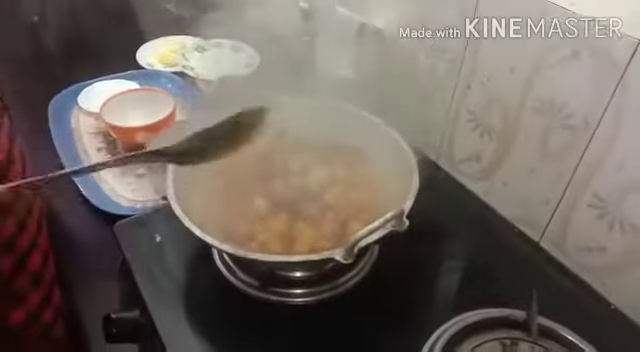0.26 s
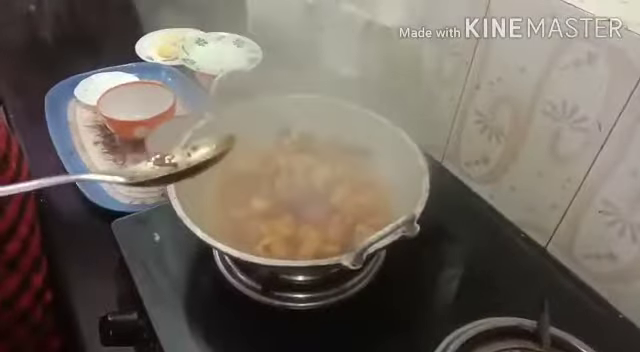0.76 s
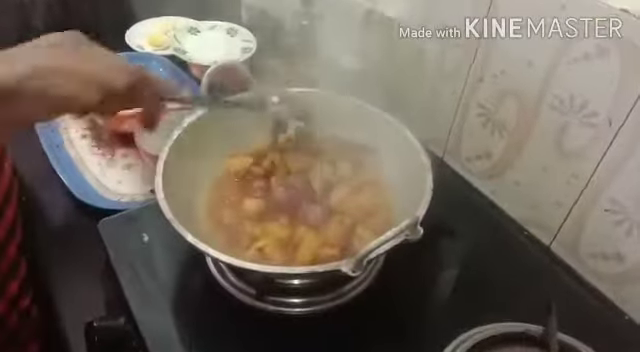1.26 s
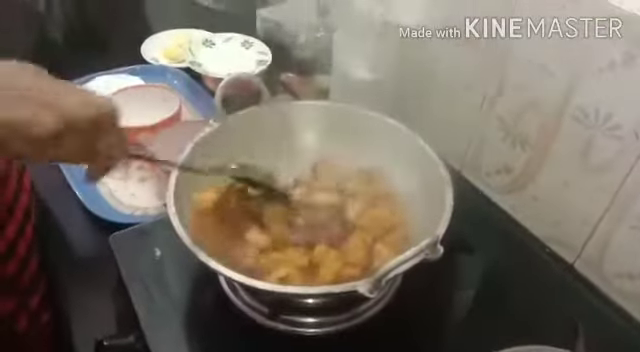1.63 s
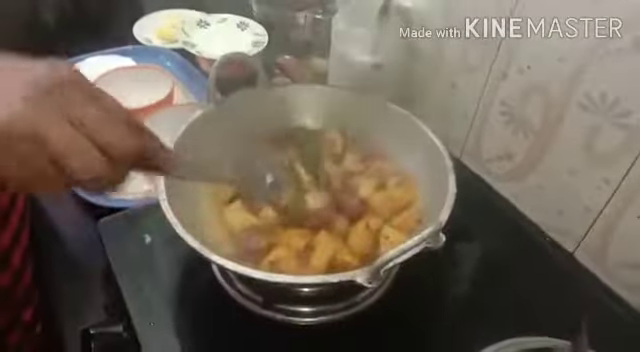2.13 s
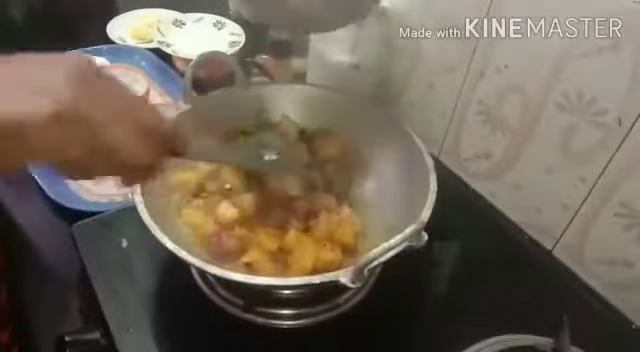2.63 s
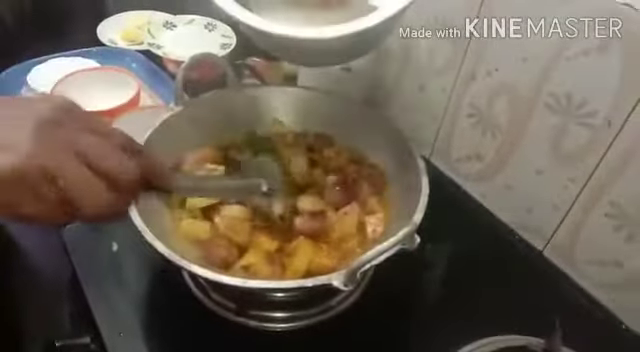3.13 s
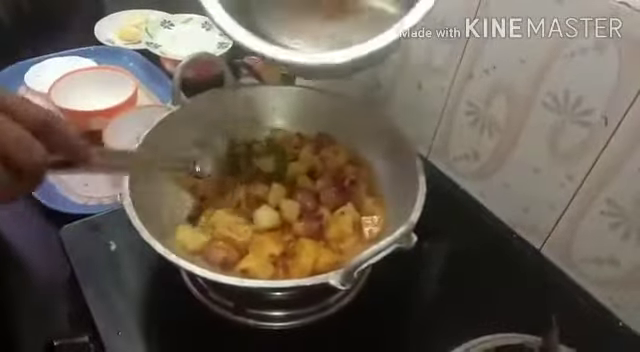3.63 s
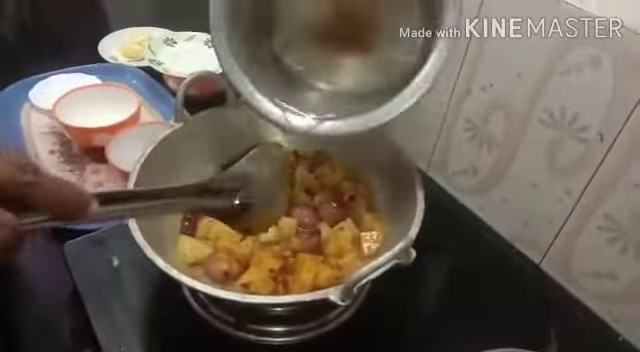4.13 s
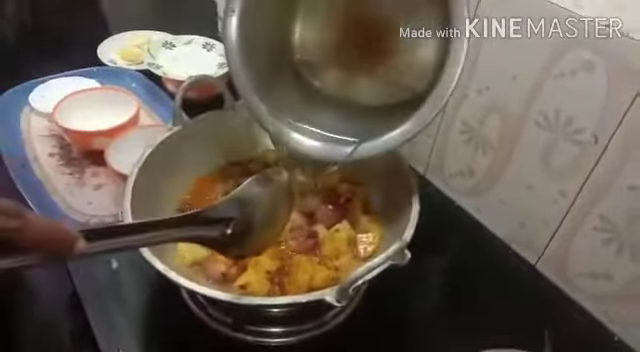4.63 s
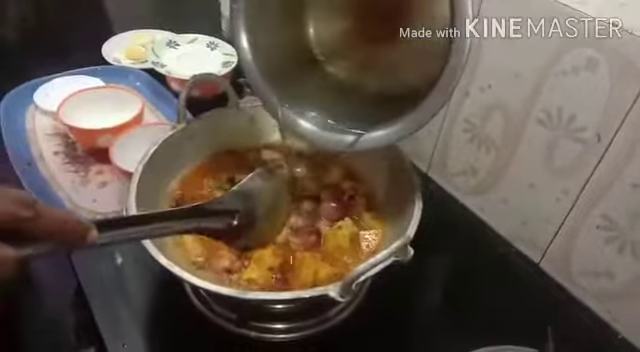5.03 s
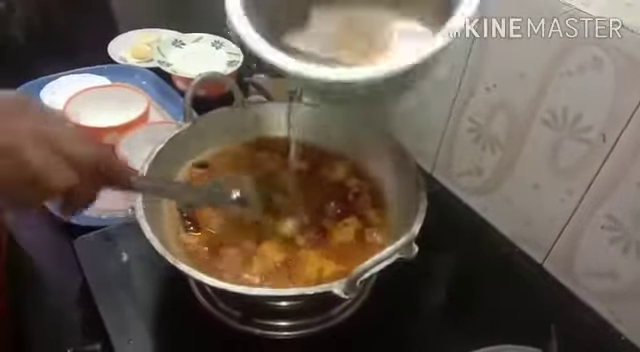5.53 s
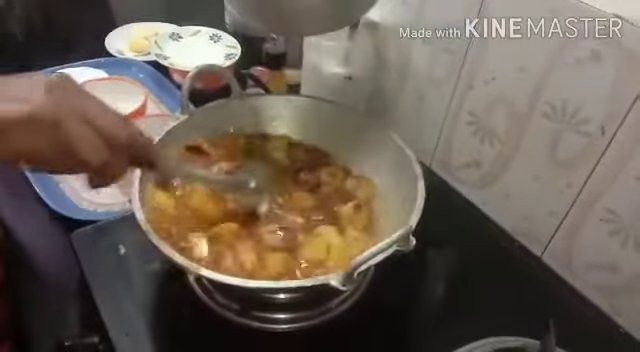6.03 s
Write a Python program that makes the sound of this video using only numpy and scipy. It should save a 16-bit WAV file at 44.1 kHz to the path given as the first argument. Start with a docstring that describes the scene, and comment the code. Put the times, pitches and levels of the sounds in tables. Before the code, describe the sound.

Close, loud frying with ringing spoon knocks on metal, briefly quenched by poured water before a wet boil returns with brisk stirring.

```python
"""Sizzling pan, spoon and water pot

Vegetables sizzle in a hot metal pan in a small tiled kitchen: randomly bursting bubbles plus crackle and spray.
A steel spoon clicks on the pan, rings its modes and scrapes as it turns the food; most strokes swell the sizzle.
Water from a pot quenches the frying, then comes to the boil and is stirred in; a gas burner rushes low beneath.
A phone close above hears it in mono; its limiter ducks the whole sound around the loudest peaks."""
import sys
import numpy as np
from scipy import signal
from scipy.fft import rfft, irfft
from scipy.io import wavfile
from scipy.ndimage import uniform_filter1d, minimum_filter1d

SR = 44100
rng = np.random.default_rng(int(sys.argv[2]) if len(sys.argv) > 2 else 0)


def wav_record(signal):
    """Record a signal, one row per channel, as 16-bit PCM in the file named by sys.argv[1]."""
    frames = np.transpose(np.atleast_2d(signal))
    bounded = np.clip(frames, -1, 1)
    # unit amplitude maps onto the largest positive 16-bit level
    quanta = np.round(bounded * 32767).astype(np.int16)
    wavfile.write(sys.argv[1], SR, quanta)


N = 276892
TIME = np.arange(N) / SR


def undb(db):
    """Decibels to gain."""
    return 10 ** (np.asarray(db) / 20)


def curve(table):
    """Straight lines through rows of (seconds, value), as a control over the whole scene."""
    seconds, values = np.transpose(table)
    return np.interp(TIME, seconds, values)


def ramp(start_s, takes_s):
    """A change from 0 to 1 that starts at start_s."""
    return np.clip((TIME - start_s) / takes_s, 0, 1)


def add(track, start_s, sound):
    """Mix a sound into the track at start_s."""
    i = int(start_s * SR)
    track[i:i + len(sound)] += sound[:N - i]


def unit(x):
    """Scale to rms 1."""
    return x / np.sqrt(np.mean(x ** 2))


def colour(x, spectrum):
    """Minimum-phase filter, built by folding the cepstrum, with the given (Hz, dB) shape; rms 1."""
    hz, db = np.transpose(spectrum)
    size = 4096
    bin_hz = np.arange(size // 2 + 1) * SR / size
    bin_db = np.interp(np.log(bin_hz + 1), np.log(hz), db)
    cepstrum = irfft(np.log(undb(bin_db)))
    cepstrum[1:size // 2] *= 2
    cepstrum[size // 2 + 1:] = 0
    impulse = irfft(np.exp(rfft(cepstrum)))
    return unit(signal.fftconvolve(x, impulse)[:len(x)])


def band(x, hz):
    """One broad resonance."""
    return colour(x, [(hz / 8, -50), (hz * 0.93, -9), (hz, 0), (hz * 1.25, -10), (hz * 4, -50)])


def walk(rate_hz):
    """Slow chance of rms 1, with rate_hz new random values a second joined by lines."""
    knots = rng.standard_normal(2048)
    return unit(np.interp(TIME * rate_hz, np.arange(len(knots)), knots))


def pops(rate_hz, spread_db):
    """Random one-sample bursts of either sign, with sizes scattered in dB."""
    chance, size = rng.random(N), rng.standard_normal(N)
    heights = undb(spread_db * np.clip(size, -3, 3))
    return (chance < rate_hz / SR) * heights * rng.choice([-1, 1], N)


def ring(modes, size=SR):
    """Decaying sines of alternating sign from rows (Hz, t60 in seconds, dB)."""
    t = TIME[:size]
    total = 0
    for k, (hz, t60, db) in enumerate(modes):
        total = total + (-1) ** k * undb(db - 60 * t / t60) * np.sin(2 * np.pi * hz * t)
    return total


def kitchen(x, wet_db, t60):
    """Tiled walls return a dense, short tail, here decaying noise that starts after 3 ms."""
    t = TIME[:SR // 2]
    tail = rng.standard_normal(len(t)) * undb(-60 * t / t60) * (t > .003)
    return x + undb(wet_db) * signal.fftconvolve(x, tail / np.linalg.norm(tail))[:N]


# Low rush under the stove. Each row: frequency in Hz, level in dB.
BURNER_SPECTRUM = [(25, -8), (50, -10), (72, -3), (100, 1), (150, 4.5), (215, -5), (275, -8), (300, 4.5),
                   (340, -5.5), (450, -9), (700, -13.5), (2000, -20.5)]


def burner():
    """The gas burner rushes as low noise whose level wanders."""
    return undb(-53.0 + walk(9.9)) * colour(rng.standard_normal(N), BURNER_SPECTRUM)


# The spoon spreads the sauce and bares hot metal; later the water runs in.
SPREAD_S, SPREAD_TAKES_S = 1.51, 0.54
POUR_S, POUR_TAKES_S = 3.93, 0.76
# Heat of the pan floor, sinking under the water and recovering. Each row: time in seconds, heat in dB.
PAN_HEAT = [(0, 0), (1.4, -2.2), (2.0, 0), (2.55, -0.15), (3.1, -3), (3.8, -3), (4.55, -11.5), (4.9, -11),
            (5.08, -5), (6.28, -4)]


def sizzle_db(law):
    """Level of one part of the sizzle from heat, stirring, bared metal and added water."""
    base_db, per_heat, per_surge, spread_db, water_db = law
    driven = base_db + per_heat * curve(PAN_HEAT) + per_surge * surge()
    bared = spread_db * ramp(SPREAD_S, SPREAD_TAKES_S)
    watered = water_db * ramp(POUR_S, POUR_TAKES_S)
    return driven + bared + watered


def bubbles(rate_hz, cycles, glide, count=24):
    """Steam bubbles of many sizes, each fading by 1/e in so many cycles and sliding in pitch."""
    out, t = 0, TIME[:SR // 25]
    for hz in np.geomspace(1000, 4400, count):
        age = t * hz / cycles
        chirp = np.exp(-age) * np.sin(2 * np.pi * hz * t * (1 + glide * np.tanh(age)))
        bursts = pops(rate_hz / count, spread_db=1.5)
        out = out + hz * signal.fftconvolve(bursts, chirp)[:N]
    return unit(out)


# Air in the bowl of the pan. Each row: frequency in Hz, sharpness Q, boost as a gain.
BOWL_RESONANCES = [(674, 15, 0.99), (1250, 16, 1.0), (3085, 40, 0.1)]


def bowl(x):
    """The hollow of the pan resonates with whatever boils in it."""
    out = x
    for hz, q, boost in BOWL_RESONANCES:
        out = out + boost * signal.lfilter(*signal.iirpeak(hz, q, fs=SR), x)
    return out


# How the boiling answers the pan. The row: base level in dB, dB per dB of heat, dB per dB of surge,
# change in dB once the sauce is spread, change in dB once watered.
BOILING_LAW = (-21, 0.76, 0.7, -7, 5)
# Share of thin, watery liquid in the pan. Each row: time in seconds, share from 0 to 1.
THIN_SHARE = [(0, 0.02), (1.3, 0), (1.9, 0.09), (2.6, 0.63), (3.5, 0.87), (4.5, 0.97), (6.28, 0.94)]
# Boiling sauce, then boiling water. Each row: frequency in Hz, level in dB.
SAUCE_SPECTRUM = [(80, -67), (270, -26), (550, -23.5), (700, -18), (850, -18), (1250, -14.5), (1550, -9),
                  (2000, -4.5), (2400, 1), (2900, -2), (3600, -7.5), (4500, -15), (5450, -6.5), (6800, -22)]
WATER_SPECTRUM = [(100, -79), (450, -38.5), (850, -16.5), (1200, -10.5), (1400, -9.5), (1700, -11),
                  (2150, -4.5), (3000, 0.5), (3900, -2), (4650, -16), (5400, -9), (6200, -7.5),
                  (7100, -3.5), (8200, -36)]


def boiling():
    """Bubbles burst and ring in the bowl, crossfading from thick sauce to thin water; both flicker in level."""
    thin = np.clip(curve(THIN_SHARE), 0, 1)
    froth = unit(pops(25000, spread_db=2.5)) + undb(-10.5) * bubbles(1800, cycles=7.7, glide=0.039)
    thick = colour(froth, SAUCE_SPECTRUM) * undb(0.34 * walk(70) + 0.22)
    other_froth = np.roll(froth, N // 2)  # so that the two layers do not burst together
    water = colour(other_froth, WATER_SPECTRUM) * undb(0.39 * walk(40) + 0.05)
    mix = undb(sizzle_db(BOILING_LAW)) * (np.sqrt(1 - thin) * thick + np.sqrt(thin) * water)
    return kitchen(bowl(mix), wet_db=-11.0, t60=0.22)


# How crackle and spray answer the pan. Each row: base level in dB before a small trim, dB per dB of heat,
# dB per dB of surge, change in dB once the sauce is spread, change in dB once watered.
CRACKLE_LAW = (-31.5, 1, 0.83, 5.5, -0.6)
FINE_SPRAY_LAW = (-26, 1.4, 1.16, -9, 2.5)
# Oil crackle, then the finer spray above it. Each row: frequency in Hz, level in dB.
CRACKLE_SPECTRUM = [(1000, -55), (4200, -9), (5100, -5.5), (5800, -4), (6350, -6), (7000, -1.5), (7550, 2),
                    (8050, -3), (9000, 3), (9900, 1), (10800, -4.5), (12000, -12.5), (13500, -16.5)]
SPRAY_SPECTRUM = [(3000, -52), (8000, -18), (10200, -2.5), (11300, 1.5), (12200, -5.5), (13000, -7),
                  (13850, -10), (14600, 4), (15100, 4), (15600, 1)]


def frying():
    """Droplets explode in hot oil: a dense crackle with a finer spray above it."""
    crackle = unit(pops(28000, spread_db=1.0)) + undb(-9) * unit(pops(150, spread_db=3.0))
    crackle_db = sizzle_db(CRACKLE_LAW) + .5 * walk(45) - 1.5
    spray_db = sizzle_db(FINE_SPRAY_LAW) + 0.85 * walk(70) + 2.15
    fry = colour(crackle, CRACKLE_SPECTRUM) * undb(crackle_db)
    spray = colour(pops(18000, spread_db=1.5), SPRAY_SPECTRUM) * undb(spray_db)
    return fry + spray


BUMP_ATTACK_S, BUMP_T60_S = 0.0044, 0.29
SETTLE_S, SETTLE_DB, BODY_DB = .072, -12, -1.5  # settling comes later and softer than its bump
# Low, damped body of the loaded pan. Each row: frequency in Hz, level in dB.
PAN_BODY = [(130, -37), (205, -18), (250, 1), (340, -1.5), (450, -19), (600, -10), (740, -3.5), (860, -9),
            (1100, -26)]
# Dull bumps of food and spoon. Each row: start in seconds, level in dB, contact pitch in Hz.
FOOD_BUMPS = [(.582, -29.5, 456), (1.418, -33.5, 370), (2.04, -37.5, 223), (2.45, -31, 268),
              (3.565, -30, 290), (3.655, -35.5, 270), (4.303, -46.5, 516), (4.52, -44, 320),
              (5.772, -30, 400)]


def bumps():
    """Food and spoon bump dully, the loaded pan answers with its body, and the food settles after each."""
    out, t = np.zeros(N), TIME[:SR]
    thud = undb(-60 * t / BUMP_T60_S) * (1 - np.exp(-t / BUMP_ATTACK_S))
    for s, db, hz in FOOD_BUMPS:
        for at, at_db in (s, db), (s + SETTLE_S, db + SETTLE_DB):
            contact, body = rng.standard_normal((2, len(t)))
            add(out, at, undb(at_db) * thud * (band(contact, hz) + undb(BODY_DB) * colour(body, PAN_BODY)))
    return out


# Ring of pan and spoon. Each row: frequency in Hz, t60 in seconds, then levels in dB when struck
# at the far wall, at the right wall and at the left wall.
PAN_RING = [(258, .35, -48, -33, -42), (301, 1.4, -44, -36, -50), (339, 1.15, -33, -31, -35),
            (842, .65, -29, -35, -38), (1405, 1.1, -31, -54, -27), (1470, 1.1, -19, -55, -35),
            (1970, .72, -8, -28, -19), (2315, .9, -25, -28, -27), (2756, .65, -20, -20, -13),
            (3135, .78, -20, -30, -14), (3612, .62, -16, -20, -12), (4134, .47, -20, -43, -10),
            (4947, .7, -34, -48, -29), (5416, .45, -31, -37, -29), (7644, .25, -50, -32, -40),
            (8958, .16, -43, -15, -34), (9400, .12, -45, -22, -32)]
# Dense weak modes beneath the ring. Each row: frequency in Hz, level in dB.
CLATTER_SPECTRUM = [(200, -25), (900, -15), (1400, -8.5), (2200, -3), (2700, 0), (3600, -14), (4400, -14),
                    (7000, -20.5)]
# Spoon on the pan. Each row: start in seconds, ring in dB, click peak in dB, click pitch in Hz,
# clatter in dB, place (0 far wall, 1 right wall, 2 left wall).
SPOON_STRIKES = [(1.4185, -2.5, 2.5, 1800, -24.5, 0), (2.4486, -4, -7, 5500, -36, 1),
                 (3.4985, -2, 4.5, 3500, -17, 2), (5.7098, -22, -6, 2000, -28.5, 1)]


def strikes():
    """The spoon clicks on the pan, which rings according to where it is hit; dense weak modes clatter beneath."""
    clicks, rings, t = np.zeros(N), np.zeros(N), TIME[:SR]
    for s, ring_db, click_db, hz, clatter_db, place in SPOON_STRIKES:
        modes = [(f, t60, place_db[place]) for f, t60, *place_db in PAN_RING]
        add(rings, s, undb(ring_db) * ring(modes))
        clatter = colour(rng.standard_normal(len(t)), CLATTER_SPECTRUM)
        add(rings, s, clatter * undb(clatter_db - 60 * t / 0.84))
        click_shape = [(hz / 16, -36), (hz / 2, -7), (hz, 0), (hz * 2, -12), (hz * 5, -26)]
        click = colour(signal.unit_impulse(SR // 50), click_shape)
        add(clicks, s, undb(click_db) * click / np.abs(click).max())
    return kitchen(clicks, wet_db=-2.5, t60=0.25) + kitchen(rings, wet_db=-13, t60=.4)


# Spoon scraping on the pan. Each row: frequency in Hz, level in dB.
SCRAPE_SPECTRUM = [(120, -19), (280, -6), (420, -3.5), (550, -6), (700, 1.5), (950, -1), (1120, -8.5),
                   (1250, 10), (1450, -8), (2500, 0.5), (3500, -8), (7000, -26)]
# Strokes turn wet food onto hot metal. Each row: start in seconds, length in seconds, scrape in dB,
# surge of the sizzle in dB.
SPOON_STROKES = [(1.578, 0.26, -40, 4), (1.958, 0.19, -37.5, 1), (2.186, 0.16, -41, 2),
                 (2.61, .2, -38, 5.5), (3.201, 0.097, -42, 8.5), (4.268, 0.041, -55, 2.5),
                 (5.707, 0.11, -26, -0.5), (5.81, 0.24, -36, 5), (6.127, 0.17, -31.5, 4)]


def stirring():
    """The spoon sticks and slips along the pan as random pops, each stroke starting fast and fading out."""
    force = np.zeros(N)
    for s, length, db, _ in SPOON_STROKES:
        u = np.arange(int(length * SR)) / (length * SR)
        add(force, s, undb(db) * np.minimum(u / 0.02, 1) * np.sqrt(1 - u))
    return kitchen(force * colour(pops(2500, spread_db=3.0), SCRAPE_SPECTRUM), wet_db=0, t60=0.37)


def surge(rise_s=0.036, fall_s=0.12):
    """The sizzle moves by each stroke's surge while it lasts and settles back after it, in dB."""
    total = 0
    for s, length, _, db in SPOON_STROKES:
        rise = 1 - np.exp(-np.clip(TIME - s, 0, length) / rise_s)
        total = total + db * rise * np.exp(-np.maximum(TIME - s - length, 0) / fall_s)
    return total


# Pieces pressed on bare hot metal. Each row: start in seconds, length in seconds, level in dB, pitch in Hz.
STEAM_FLARES = [(1.749, 0.54, -27, 9250), (2.02, 0.34, -29.5, 4900), (2.1, 0.29, -32.5, 3950),
                (5.86, 0.11, -29.5, 3880), (5.87, .17, -30.5, 5400)]


def flares():
    """Steam squeezed from under a piece of food hisses in a narrow band that swells and fades."""
    out = np.zeros(N)
    for s, length, db, hz in STEAM_FLARES:
        swell = np.sqrt(np.hanning(int(length * SR)).clip(0))
        jet_shape = [(hz / 4, -55), (hz * 0.76, -15), (hz, 0), (hz * 1.4, -15), (hz * 2, -40)]
        jet = colour(rng.standard_normal(len(swell)), jet_shape)
        add(out, s, undb(db) * swell * jet)
    return out


POT_S, POT_DB = 4.4895, -19
WALL_S, WALL_DB = .0217, -9  # echo off the wall behind the stove
# Ring of the water pot. Each row: frequency in Hz, t60 in seconds, level in dB.
POT_RING = [(640, .04, -3), (877, .36, -10.5), (1152, .17, 0), (1766, .3, -16)]


def pot():
    """The tilted pot takes one soft knock, its modes ring, and the wall echoes it once."""
    out, t = np.zeros(N), TIME[:SR]
    knock = undb(POT_DB) * ring(POT_RING) * (1 - np.exp(-t / 0.0013))
    add(out, POT_S, knock)
    add(out, POT_S + WALL_S, undb(WALL_DB) * knock)
    return kitchen(out, wet_db=-13, t60=.35)


def scene():
    """Pan, spoon and pot over the low rush of the gas burner, the same in both channels."""
    sizzle = boiling() + frying() + flares()
    spoon_and_pot = bumps() + strikes() + stirring() + pot()
    mono = burner() + sizzle + spoon_and_pot
    return np.array([mono, mono])


def limiter(x, ceiling_db, release_s, ahead_s, hold_s):
    """Turns down just ahead of each peak over the ceiling, holds, and recovers slowly."""
    over_db = np.maximum(20 * np.log10(np.abs(x).max(axis=0) + 1e-9) - ceiling_db, 0)
    fade = np.exp(-TIME / release_s)
    cut_db = np.maximum.accumulate(over_db / fade) * fade  # the strongest decaying cut so far
    ahead, hold = int(ahead_s * SR), int(hold_s * SR)
    gain_db = minimum_filter1d(-cut_db, ahead + hold, origin=(hold - ahead) // 2)
    return x * undb(uniform_filter1d(gain_db, ahead // 2))


def record(dry):
    """The phone thins the rumble, limits the peaks and cuts the top."""
    thinned = signal.sosfilt(signal.butter(2, 55, "high", fs=SR, output="sos"), dry)
    limited = limiter(thinned, ceiling_db=-2.8, release_s=.12, ahead_s=.016, hold_s=.04)
    return signal.sosfilt(signal.ellip(10, .2, 80, 15600, fs=SR, output="sos"), limited)


dry = scene()
out = record(dry)
wav_record(out)
```